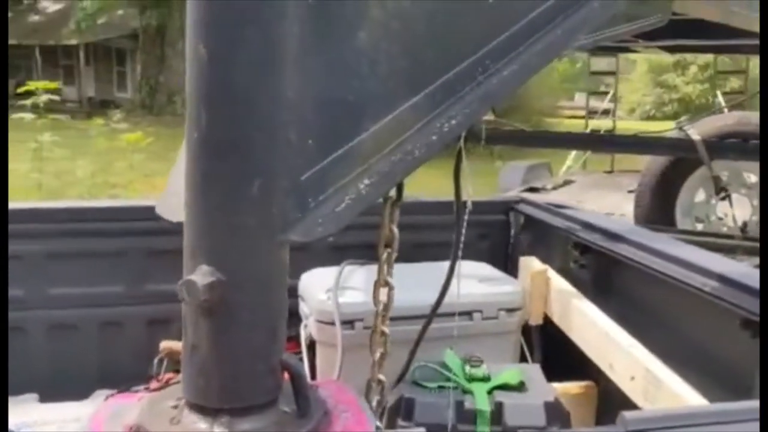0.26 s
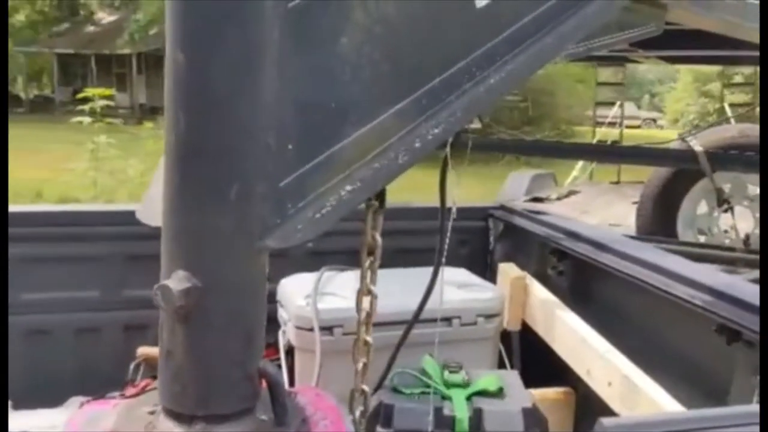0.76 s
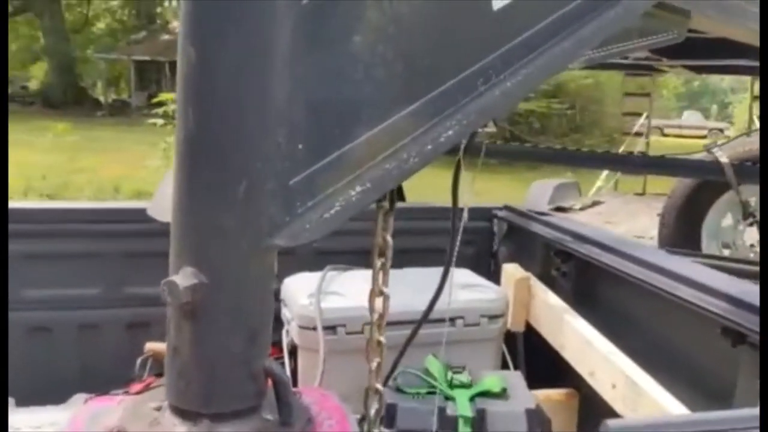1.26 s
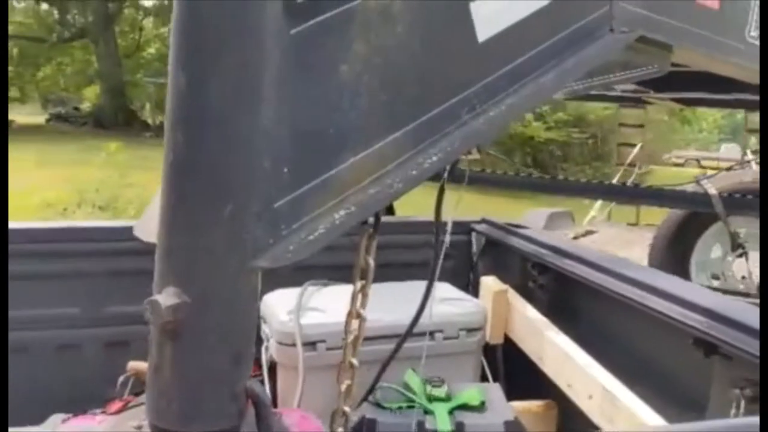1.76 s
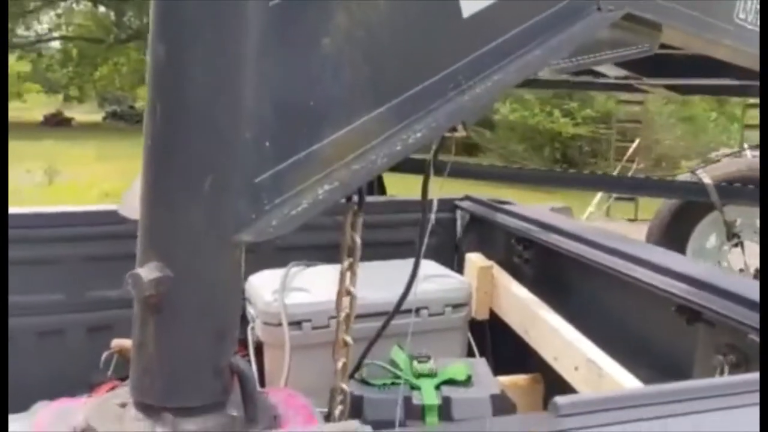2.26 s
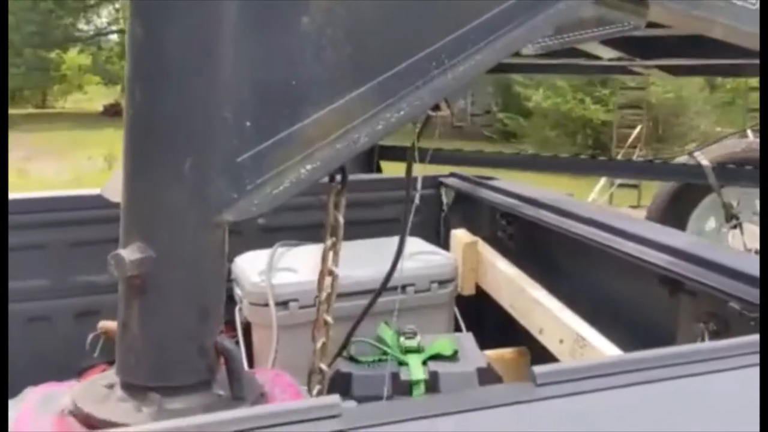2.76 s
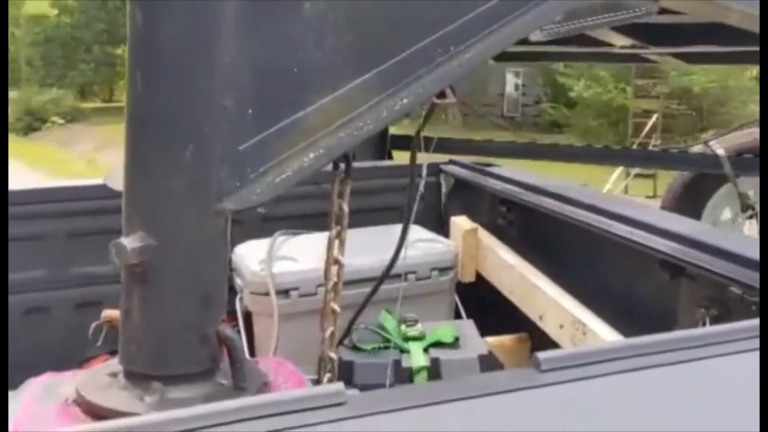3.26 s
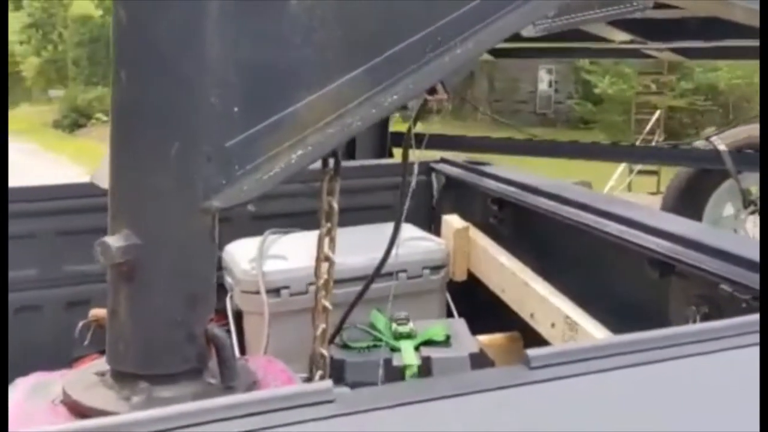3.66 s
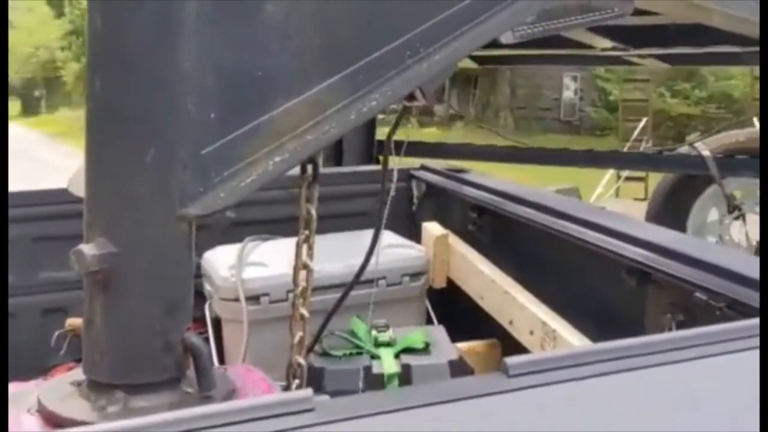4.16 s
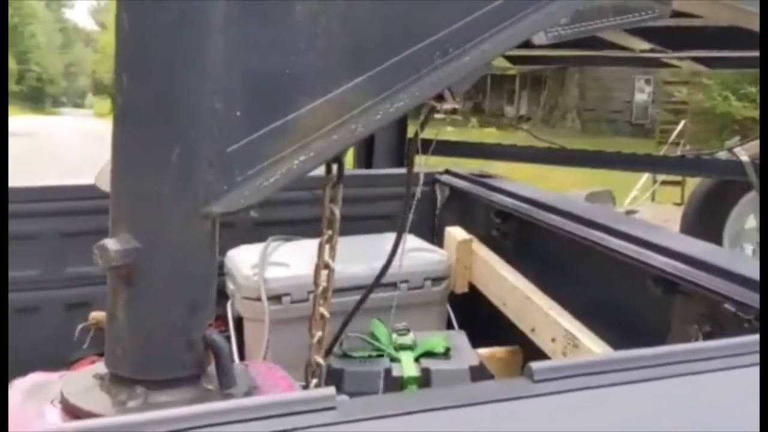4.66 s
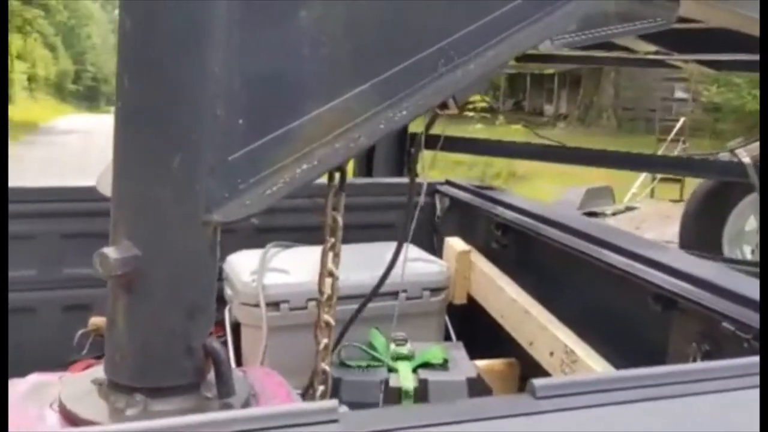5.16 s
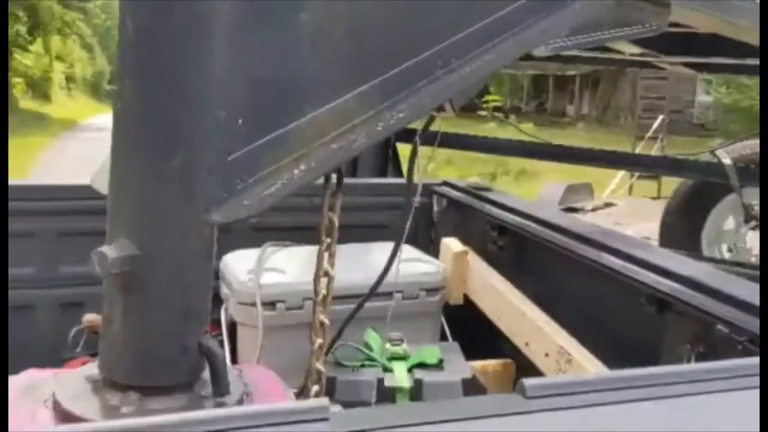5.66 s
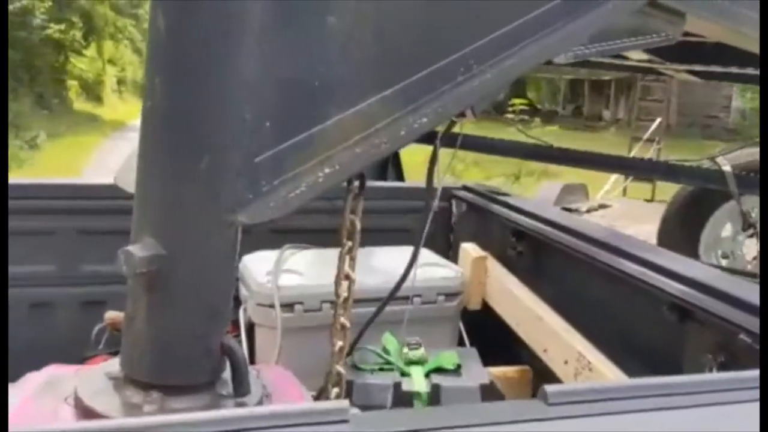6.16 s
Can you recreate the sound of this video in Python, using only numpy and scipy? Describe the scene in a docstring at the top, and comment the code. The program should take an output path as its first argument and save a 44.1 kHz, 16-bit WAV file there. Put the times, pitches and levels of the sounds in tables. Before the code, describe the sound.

A pickup tows a trailer slowly, heard from the cab window, with a low exhaust boom over continuous tyre roar and engine hiss. Sharp steel hitch knocks come right at the start and again around 0.7 and 1.1 seconds as the engine swells. The hitch gives one short, high squeak at about 1.5 seconds. Faint chain ticks and dull load thuds are scattered throughout. From 2 to 3 seconds the engine eases off, lower and quieter. Between 3 and 3.5 seconds loose deck boards rattle, along with hitch knocks and thuds in the bed. The engine pulls again and rises in pitch, booming strongest around 4.5 seconds, then falters unevenly from about 5.4 seconds at higher revs. Near 6.3 seconds the boom swells once more, with a cluster of loud metal knocks and a thud.

```python
"""A V8 pickup's exhaust booms, eases off and pulls again, towing a gooseneck trailer slowly onto a road.
Heard from the cab window, the boom is a tone at the firing rate over weaker engine orders and gas puffs.
The steel hitch knocks as its slack closes and squeaks once as it slips on the ball. Its chain ticks,
loose deck boards rattle and the load thuds in the bed. Tyre roar and engine hiss run underneath."""
import sys
import numpy as np
from scipy import signal
from scipy.fft import rfft, irfft, next_fast_len
from scipy.io import wavfile
from scipy.ndimage import uniform_filter1d

SR = 44100
rng = np.random.default_rng(int(sys.argv[2]) if len(sys.argv) > 2 else 0)


def master_out(mix):
    """Clip the mix to full scale and print it as 16-bit PCM to the path in sys.argv[1]."""
    frames = np.transpose(np.atleast_2d(mix))
    ceiling = np.clip(frames, -1, 1)
    pcm = np.round(ceiling * 32767).astype(np.int16)
    wavfile.write(sys.argv[1], SR, pcm)


N = 282681
TIME = np.arange(N) / SR
TOP_HZ = 13100


def from_db(db):
    """Decibels to gain."""
    return 10 ** (np.asarray(db) / 20)


def unit(x):
    """Scales to rms 1."""
    return x / np.sqrt(np.mean(x ** 2) + 1e-20)


def follow(curve):
    """A (seconds, value) curve at every sample."""
    return np.interp(TIME, *np.transpose(curve))


def at_hz(points, hz):
    """Reads a spectrum on a log-frequency axis."""
    f, value = np.transpose(points)
    return np.interp(np.log(hz + 1), np.log(f + 1), value)


def humps(rows, axis):
    """Sum in dB of bell curves (centre, half width, dB) over time or frequency."""
    return sum(db * np.exp(-((axis - centre) / width) ** 2) for centre, width, db in rows)


def add(mix, s, sound):
    """Mixes a sound in at s seconds."""
    part = mix[:, max(round(s * SR), 0):][:, :sound.shape[-1]]
    part += sound[..., :part.shape[-1]]


def waver(top_hz):
    """Random drift of rms 1, rolled off above top_hz."""
    hz = np.fft.rfftfreq(N, 1 / SR)
    return unit(irfft(rfft(rng.standard_normal(N)) * np.exp(-(hz / top_hz) ** 2), N))


def throb(firings, depth):
    """Gain that swells at every firing."""
    return unit(1 + depth * np.cos(2 * np.pi * firings))


# Likeness of the two channels. Each row: frequency in Hz, left-right correlation.
CORRELATION = [(60, 0.76), (130, 0.39), (300, 0.73), (800, 0.89), (1080, 0.72), (1280, 0.22), (1550, -0.66),
               (2100, -0.18), (3500, 0.011), (5000, -0.06)]

def noise(colour, size=N):
    """Coloured stereo noise of rms 1, alike in the bass, unrelated in the treble."""
    hz = np.fft.rfftfreq(size, 1 / SR)
    left, other = rfft(rng.standard_normal((2, size)))
    same = np.clip(at_hz(CORRELATION, hz), -1, 1)
    right = same * left + np.sqrt(1 - same ** 2) * other
    return unit(irfft(np.array([left, right]) * from_db(at_hz(colour, hz)), size))


def strike(t, t60_s, rise_s):
    """Envelope of a blow: quick rise, exponential decay."""
    return (1 - np.exp(-t / rise_s)) * from_db(-60 * t / t60_s)


def burst(colour, t60_s, rise_s):
    """Noise that swells and dies away."""
    t = np.arange(SR // 2) / SR
    return noise(colour, size=len(t)) * strike(t, t60_s, rise_s)


def ring(modes, scatter_db=3, detune=0.0073, apart_cycles=1):
    """Struck modes, detuned a little by the load; level and phase differ at each microphone."""
    t = np.arange(SR // 2) / SR
    tones = np.zeros((2, len(t)))
    for hz, db, t60_s in modes:
        lag, luck = rng.random((2, 2, 1))
        detuned_hz = hz * (1 + detune * rng.uniform(-1.15, 1))
        cycles = detuned_hz * t + rng.random() + apart_cycles * lag
        gain = from_db(db + 2 * scatter_db * (luck - 1))
        tones += gain * strike(t, t60_s, rise_s=0.0031) * np.sin(2 * np.pi * cycles)
    return tones


def contact(sound, centre_hz, boost=1.71, q=2.07, reach=2.6):
    """Contact hardness brings out one band and excites little far above it."""
    peaked = sound + boost * signal.lfilter(*signal.iirpeak(centre_hz, q, SR), sound)
    cutoff_hz = min(reach * centre_hz, TOP_HZ)
    return signal.sosfilt(signal.butter(4, cutoff_hz, fs=SR, output="sos"), peaked)


# Tyre roar. Each row: frequency in Hz, relative level in dB.
TYRE_SPECTRUM = [(100, 4.5), (220, 0.5), (310, 6), (440, -2.5), (540, 1), (640, -2.5), (800, -1.5),
                 (1080, -1), (1230, -6), (1400, -2), (1650, -6.5), (2200, -6.5), (4000, -22.5),
                 (12000, -39)]
# Rough ground. Each row: centre in seconds, half length in seconds, extra roar in dB.
ROUGH_PATCHES = [(2.3, 0.037, 5.5), (2.52, 0.031, 2.5), (3.25, 0.14, 1.5), (4.65, 0.088, 2)]

def tyres(level_db=-37.5, flutter_db=1.45):
    """Tyres roar louder with speed and on rough ground."""
    roar_db = level_db + revs_db(per_octave=8) + humps(ROUGH_PATCHES, TIME)
    return from_db(roar_db + flutter_db * waver(23.5)) * noise(TYRE_SPECTRUM)


# Engine hiss. Each row: frequency in Hz, relative level in dB.
HISS_SPECTRUM = [(800, -32), (1700, -25), (2100, 1.5), (2500, 2.5), (3100, -1), (3450, -9), (4100, -10.5),
                 (5200, -15), (6300, -28.5), (8200, -25.5), (9900, -19), (11000, -31), (12000, -22.5),
                 (13300, -71)]

def engine_hiss(firings, level_db=-42.5, flutter_db=1.5):
    """Hiss grows with revs and effort and beats with the firings."""
    hiss_db = level_db + revs_db(per_octave=5) + 0.11 * effort_db()
    return from_db(hiss_db + flutter_db * waver(22)) * noise(HISS_SPECTRUM) * throb(firings, depth=0.051)


# Peaks and dips in the running noise. Each row: centre in Hz, half width in Hz, gain in dB.
RUNNING_EQ = [(1062, 9.7, 4.5), (1390, 18, 2.5), (2174, 16, -10), (3930, 19, 7.5), (4960, 110, -2),
              (5670, 180, 3), (7220, 30, 9), (9857, 25, 3)]

def running_noise(firings):
    """Tyres and hiss, coloured by narrow peaks and dips."""
    gain = from_db(humps(RUNNING_EQ, np.fft.rfftfreq(N, 1 / SR)))
    return irfft(rfft(tyres() + engine_hiss(firings)) * gain, N)


# Link scrape. Each row: frequency in Hz, relative level in dB.
SCRAPE_SPECTRUM = [(2000, -21), (4000, 14), (5200, 3), (6200, 5.5), (7300, 4), (10000, 4), (13000, -6)]
# Link modes. Each row: frequency in Hz, level in dB, longest T60 in seconds.
LINK_MODES = [(5140, 18, 0.04), (6600, 15, 0.05), (7600, 16, 0.05), (8600, 15, 0.06), (9550, 15, 0.05),
              (11000, 14, 0.05), (12000, 14, 0.05)]

def clink(t60_s, crack_db=3.5, links_db=-23, rebound_db=-2, spread=0.078, grain_db=3.5):
    """Link on link: a crack, its rebound, a gritty scrape and the dry ring of unequal links."""
    modes = [(hz * (1 + spread * rng.uniform(-1.01, 1)), db, min(longest_s, t60_s))
             for hz, db, longest_s in LINK_MODES]
    scrape = burst(SCRAPE_SPECTRUM, t60_s, rise_s=0.003)
    grain = unit(uniform_filter1d(rng.standard_normal(scrape.shape[1]), size=SR // 400))
    out = scrape * unit(from_db(grain_db * grain)) + from_db(links_db) * ring(modes)
    rebound_s = 0.11 * t60_s * rng.uniform(0.46, 1.0)
    for delay_s, db in [(0, 0), (rebound_s, rebound_db)]:
        add(out, delay_s, from_db(crack_db + db) * burst(SCRAPE_SPECTRUM, t60_s=0.025, rise_s=0.0006))
    return out


# Chain ticks. Each row: start in seconds, level in dB, T60 in seconds.
CHAIN_TICKS = [(0.385, -52, 0.25), (1.946, -46.5, 0.15), (2.1393, -52, 0.09), (2.464, -47, 0.06),
               (2.6494, -51, 0.15), (3.207, -37, 0.043), (3.3341, -52, 0.084), (4.144, -42, 0.12),
               (4.6043, -47, 0.11), (5.225, -44, 0.13), (6.0845, -40, 0.02)]

def chain():
    """The hitch chain's links tick together."""
    out = np.zeros((2, N))
    for s, db, t60_s in CHAIN_TICKS:
        add(out, s, from_db(db) * clink(t60_s))
    return out


# Dull bump. Each row: frequency in Hz, relative level in dB.
THUD_SPECTRUM = [(80, -29), (170, 1), (240, 5), (340, -2), (520, -2.5), (800, -6.5), (1300, -29),
                 (3000, -45)]
# Load thuds. Each row: start in seconds, level in dB, T60 in seconds, panel pitch in Hz.
LOAD_THUDS = [(1.144, -29.5, 0.33, 306), (1.925, -29, 0.3, 334), (2.604, -29, 0.15, 236),
              (3.257, -26, 0.091, 306), (3.267, -21.5, 0.1, 221), (3.313, -30, 0.093, 230),
              (3.358, -31.5, 0.14, 199), (3.526, -31.5, 0.2, 339.5), (4.021, -31.5, 0.12, 298),
              (6.388, -22.5, 0.4, 313), (6.39, -20, 0.092, 558)]

def load(bump_db=-5.5, panel_db=-1):
    """The load bumps on the bed; each bump rings one panel."""
    out = np.zeros((2, N))
    t = np.arange(SR // 2) / SR
    for s, db, t60_s, hz in LOAD_THUDS:
        panel = strike(t, t60_s, rise_s=0.00038) * np.sin(2 * np.pi * hz * t)
        bump = contact(burst(THUD_SPECTRUM, t60_s, rise_s=0.0022), hz, boost=1.2, q=2.7, reach=3.45)
        add(out, s, from_db(db) * (from_db(panel_db) * panel + from_db(bump_db) * bump))
    return out


# Deck board modes. Each row: frequency in Hz, level in dB, T60 in seconds.
DECK_MODES = [(783, 4, 0.082), (865, 3, 0.084), (1040, 2.5, 0.049), (1387, -4, 0.08)]
# Deck rattles. Each row: start in seconds, level in dB.
DECK_RATTLES = [(3.054, -32), (3.079, -39), (3.12, -32.5), (3.153, -30.5), (3.2, -33), (3.245, -31.5),
                (3.33, -43), (3.405, -35.5), (3.515, -36)]

def trailer_deck(scrape_db=-6, frame_db=-9, bounce_db=-7, bounce_s=0.045):
    """The road's edge shakes the trailer: boards bounce, scrape and ring over the frame's low shudder."""
    out = np.zeros((2, N))
    for s, db in DECK_RATTLES:
        add(out, s, from_db(db + frame_db) * burst(THUD_SPECTRUM, t60_s=0.52, rise_s=0.013))
        bounces = [(bounce_s * late, bounce_db) for late in rng.random(size=2)]
        for delay_s, blow_db in [(0, 0)] + bounces:
            board = ring(DECK_MODES, detune=0.038, apart_cycles=0.099)
            scrape = from_db(scrape_db) * burst(KNOCK_SPECTRUM, t60_s=0.13, rise_s=0.002)
            add(out, s + delay_s, from_db(db + blow_db) * (board + scrape))
    return out


def truck_bed(x, wet=0.37, t60_s=0.13):
    """The bed walls add a brief tail, different at each microphone."""
    t = np.arange(SR // 8) / SR
    tail = rng.standard_normal((2, len(t))) * from_db(-60 * t / t60_s)
    tail /= np.linalg.norm(tail, axis=1, keepdims=True)
    return x + wet * signal.oaconvolve(x[None], tail, axes=1)[:, :N]


# Squeak pitch. Each row: time in seconds, fundamental in Hz.
SQUEAK_HZ = [(1.515, 2085), (1.535, 2075), (1.556, 2102), (1.58, 2114), (1.63, 2100), (1.7, 2095)]
# Squeak partials. Each row: harmonic number, level in dB, lag after the slip in seconds, T60 in seconds.
SQUEAK_HARMONICS = [(1, -24, -.003, .05), (2, -31, .006, .16), (3, -46.5, .002, .12),
                    (4, -47.5, -.002, .08)]
# Coupler slips. Each row: centre in seconds, level in dB.
COUPLER_SLIPS = [(1.522, -4), (1.541, -5), (1.556, 0), (1.571, -4), (1.587, -12), (1.607, -9), (1.652, -11),
                 (1.68, -20)]

def hitch_squeak(jitter=0.009, rasp=0.58, chatter=0.46, judder_hz=280, slip_half_s=0.008, scrape_db=-42):
    """The coupler sticks and slips on its dry ball: quick chirps, juddering overtones and a scrape."""
    cycles = np.cumsum(follow(SQUEAK_HZ) * (1 + jitter * waver(500))) / SR
    judder = np.cos(2 * np.pi * np.cumsum(judder_hz * (1 + 0.15 * waver(60))) / SR)
    tone = np.zeros(N)
    for k, db, lag_s, t60_s in SQUEAK_HARMONICS:
        drive = sum(from_db(slip_db) * np.exp(-((TIME - s - lag_s) / slip_half_s) ** 2)
                    for s, slip_db in COUPLER_SLIPS)
        pole = from_db(-60 / (t60_s * SR))
        envelope = from_db(db) * signal.lfilter([1 - pole], [1, -pole], drive + 1e-12)
        roughness = 1 + rasp * waver(120) + (k > 1) * chatter * judder
        tone += envelope * roughness * np.sin(2 * np.pi * k * cycles)
    out = truck_bed(tone)
    add(out, COUPLER_SLIPS[0][0], from_db(scrape_db) * burst(SCRAPE_SPECTRUM, t60_s=0.22, rise_s=0.035))
    return out


def bite(hz):
    """Hard contact: one bright note, damped almost at once."""
    t = np.arange(SR // 8) / SR
    return strike(t, t60_s=0.017, rise_s=0.00088) * np.sin(2 * np.pi * (hz * t + rng.random()))


# Clatter. Each row: frequency in Hz, relative level in dB.
KNOCK_SPECTRUM = [(100, -39), (300, 3), (520, 0), (800, 8.5), (1050, 2), (1400, 9.5), (2300, -2),
                  (3000, -3), (3500, -5.5), (4300, -5.5), (6000, -12), (13000, -65)]
# Hitch steel modes. Each row: frequency in Hz, level in dB, T60 in seconds.
STEEL_MODES = [(710, -7, 0.15), (1170, -3, 0.23), (1386, -5, 0.3), (1696, -8.5, 0.24), (1836, -6, 0.11),
               (2227, -0.5, 0.088), (2320, -3, 0.096), (2569, -10, 0.18), (2690, -10, 0.15),
               (2980, -1.5, 0.078), (3200, -1.5, 0.11), (3665, -10.5, 0.19), (3750, -22, 0.15),
               (4170, -22, 0.23), (4730, -16.5, 0.12), (4870, -12, 0.11), (5470, -10, 0.11)]
# Hitch knocks. Each row: start in seconds, level in dB, relative chain level in dB, clatter T60 in
# seconds, relative ring level in dB, contact pitch in Hz, relative bite level in dB.
HITCH_KNOCKS = [(0.0275, -23.5, -32, 0.068, -2, 2326, 7), (0.0337, -24, -22, 0.15, -0.5, 2330, 7),
                (0.047, -27, -19, 0.14, -7, 1400, -8), (0.1026, -31, -9, 0.26, -8, 2330, -10),
                (0.6949, -27, -9, 0.2, -7.5, 1830, -12), (0.7551, -35, -33, 0.15, 2, 2230, 7),
                (1.1251, -25.5, -7, 0.19, -4, 2910, 9.5), (1.461, -38.5, -29, 0.51, 2, 2530, -6),
                (1.604, -30, -23, 0.12, -9, 2020, -6), (1.982, -34.5, -16, 0.47, 6, 2930, -8),
                (3.0537, -29, -42, 0.11, -1.5, 1050, -3), (3.112, -43, -20, 0.3, -12, 1420, -12),
                (3.199, -30.5, -4.5, 0.083, -2.5, 2330, 4.5), (6.2955, -31, -2.5, 0.093, -2.5, 3000, -8),
                (6.326, -28, -4, 0.18, -1, 2850, -1), (6.3885, -20.5, -11.5, 0.083, -4.5, 1070, 4),
                (6.3942, -27.5, -3.5, 0.1, -6, 2450, 3), (6.4024, -19, -9, 0.25, -12, 2610, -3)]

def hitch_knocks(clatter_db=-4, steel_db=-2, snap_db=-3, crack_db=3, rebound_db=-3, rebound_s=0.007,
                 bite_lag_s=0.001995):
    """Coupler slack closes with a crack, bite and rebound; steel clatters and rings, the chain snaps."""
    out = np.zeros((2, N))
    for s, db, chain_db, t60_s, ring_db, hz, bite_db in HITCH_KNOCKS:
        clatter = burst(KNOCK_SPECTRUM, t60_s, rise_s=0.003)
        steel = from_db(clatter_db) * clatter + from_db(ring_db + steel_db) * ring(STEEL_MODES)
        for delay_s, blow_db in [(0, 0), (rebound_s * rng.uniform(0.8, 1.2), rebound_db)]:
            crack = burst(KNOCK_SPECTRUM, t60_s=0.014, rise_s=0.0002)
            add(steel, delay_s, from_db(crack_db + blow_db) * crack)
            add(out, s + delay_s + bite_lag_s, from_db(db + bite_db + blow_db) * bite(hz))
        snap = from_db(chain_db + snap_db) * clink(t60_s=0.18)
        add(out, s, from_db(db) * (contact(steel, hz) + snap))
    return out


def revs_db(per_octave, cruise_hz=52):
    """Level change as engine and wheels turn faster or slower than at cruise."""
    return per_octave * np.log2(follow(FIRING_HZ) / cruise_hz)


def effort_db(cruise_db=-19):
    """Boom level relative to cruise, averaged over a third of a second."""
    return uniform_filter1d(follow(BOOM_DB), size=SR // 3, mode="nearest") - cruise_db


# Engine speed. Each row: time in seconds, firing rate in Hz.
FIRING_HZ = [(0.0, 46.2), (0.47, 45.6), (0.78, 51.0), (1.3, 53.2), (1.84, 51.7), (2.2, 41.1), (2.88, 41.0),
             (3.22, 47.0), (3.6, 48.8), (4.02, 49.7), (4.35, 56.6), (4.7, 62.3), (5.0, 64.9), (5.7, 66.2),
             (5.95, 67.7), (6.19, 67.2), (6.41, 63.7)]
# Exhaust boom, swelling under load and faltering near top revs. Each row: time in seconds, level in dB.
BOOM_DB = [(0, -25.5), (0.52, -25.5), (0.72, -20.5), (1.19, -17), (1.78, -18), (2.11, -29.5), (2.68, -35),
           (3.0, -30), (3.43, -22), (4.03, -22.5), (4.23, -17), (4.5, -14.5), (5.0, -18.5), (5.26, -19.5),
           (5.38, -21.5), (5.44, -31), (5.51, -21), (5.57, -27), (5.64, -25), (5.7, -31), (5.76, -24.5),
           (5.89, -19), (5.95, -24.5), (6.02, -21), (6.09, -33), (6.19, -29.5), (6.25, -20.5), (6.35, -15),
           (6.41, -17.5)]
# Tones from unequal cylinders. Each row: multiple of the eight-firing cycle rate, level before the pipe
# in dB, dB gained per dB of effort.
ENGINE_ORDERS = [(7, 4, 1.5), (9, -6.5, -2), (10, -3.5, -1), (11, 3, 0), (12, -0.5, 0), (13, 4, 0.85),
                 (14, 0, 1.3), (15, -4.5, -1.2), (16, 1.5, 0), (18, -0.5, 0.1), (19, -3, 0.2), (20, 0, 0),
                 (22, -2, -0.5), (23, 1, -0.5), (25, 0, 0.7), (26, -3.5, -1), (33, -0.5, 1)]
# Exhaust pipe response. Each row: frequency in Hz, gain in dB.
PIPE_SPECTRUM = [(15, -40), (30, -62), (50, -4.5), (76, -4.5), (92, -1), (125, -8), (155, -10), (185, -7),
                 (225, -16), (300, -13), (450, -33), (900, -64)]

def exhaust(firings, orders_db=-36, gas_db=-34, unsteady=0.32, wobble_db=0.17):
    """A near-sine boom at the firing rate; weak orders and gas puffs in the pipe grow with the revs."""
    boom = np.sqrt(2) * from_db(follow(BOOM_DB) + wobble_db * waver(20)) * np.sin(2 * np.pi * firings)
    cycles, cycle_hz = firings / 8, follow(FIRING_HZ) / 8
    load_db = effort_db()
    orders = np.zeros(N)
    for k, db, growth in ENGINE_ORDERS:
        pipe_db = at_hz(PIPE_SPECTRUM, k * cycle_hz)
        gain = from_db(db + growth * load_db + pipe_db) * (1 + unsteady * waver(12))
        orders += gain * np.sin(2 * np.pi * (k * cycles + rng.random()))
    gas = noise(PIPE_SPECTRUM) * throb(firings, depth=0.34)
    flow = from_db(revs_db(per_octave=8) + 0.12 * load_db)
    return boom + flow * (from_db(orders_db) * orders + from_db(gas_db) * gas)


def scene():
    """Truck and trailer; one firing count drives exhaust and hiss."""
    firings = np.cumsum(follow(FIRING_HZ)) / SR
    truck = exhaust(firings) + running_noise(firings)
    return truck + hitch_knocks() + trailer_deck() + chain() + load() + hitch_squeak()


# Stereo balance. Each row: frequency in Hz, left minus right in dB.
BALANCE_DB = [(60, 4.5), (140, 3.5), (210, -1.5), (310, -0.5), (700, -1.5), (1200, 0.5), (8000, -2),
              (12500, 1.5)]
# Right microphone port resonances. Each row: centre in Hz, half width in Hz, gain in dB.
PORT_PEAKS = [(2481, 373, 16), (4890, 670, 6.5)]

def record(dry, low_cut_hz=12):
    """The microphones cut the deepest bass and top treble; bass leans left, the right port rings."""
    size = next_fast_len(N + SR // 4)
    hz = np.fft.rfftfreq(size, 1 / SR)
    lean_db = at_hz(BALANCE_DB, hz) / 2
    channel_gain = from_db([lean_db, humps(PORT_PEAKS, hz) - lean_db])
    low_cut = 1 / np.sqrt(1 + (low_cut_hz / (hz + 1)) ** 16)
    heard = irfft(rfft(dry, size) * low_cut * channel_gain, size)[:, :N]
    high_cut = signal.firwin(511, TOP_HZ, window=("kaiser", 9), fs=SR)
    return signal.oaconvolve(heard, high_cut[None], "same")


dry = scene()
out = record(dry)
master_out(out)
```